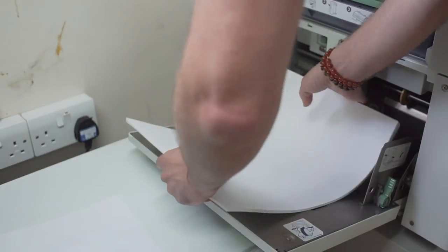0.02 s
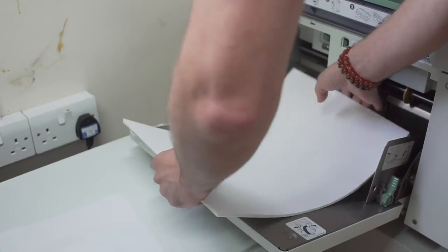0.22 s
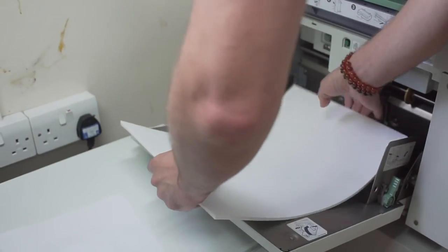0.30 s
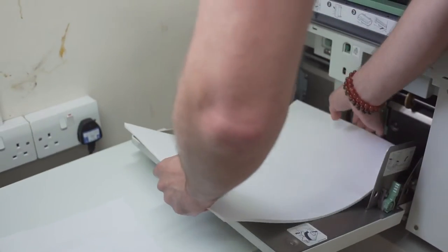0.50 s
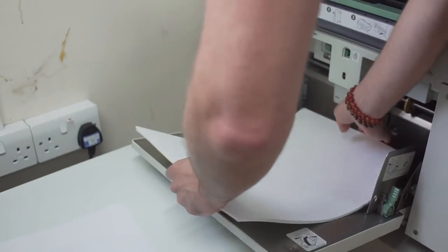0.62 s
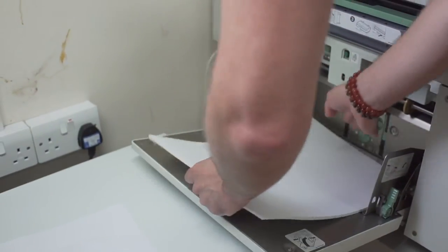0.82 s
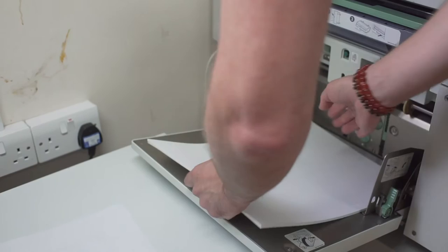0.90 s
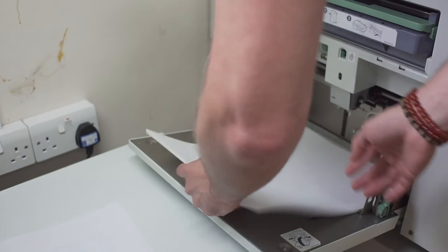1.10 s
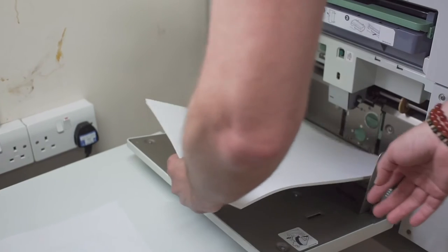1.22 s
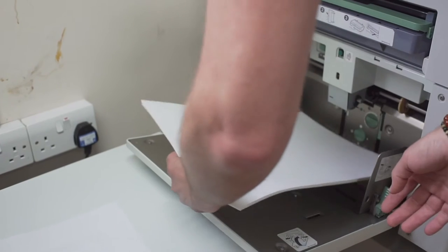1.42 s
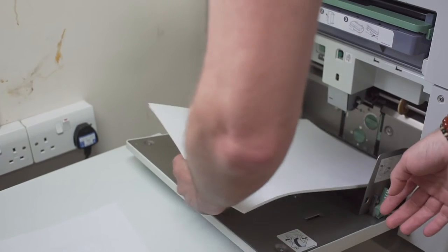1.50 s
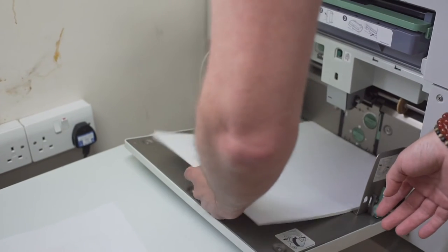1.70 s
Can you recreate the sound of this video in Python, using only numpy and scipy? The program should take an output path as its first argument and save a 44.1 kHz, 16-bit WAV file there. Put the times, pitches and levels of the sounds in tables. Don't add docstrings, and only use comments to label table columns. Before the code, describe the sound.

Close stereo pickup in a small print room: short paper drag, a loud slap and hollow metal bang with quick bounces, a light flick, a scraping slide, then dull knocks and small bumps over quiet fan hum.

```python
import sys
import numpy as np
from scipy import signal
from scipy.io import wavfile

SR = 44100
rng = np.random.default_rng(int(sys.argv[2]) if len(sys.argv) > 2 else 0)


def wav_record(signal):
    frames = np.transpose(np.atleast_2d(signal))
    bounded = np.clip(frames, -1, 1)
    quanta = np.round(bounded * 32767).astype(np.int16)
    wavfile.write(sys.argv[1], SR, quanta)


def volts_from_db(level):
    exponent = np.asarray(level, float) / 20
    return 10 ** exponent


N = 74970

# (frequency [Hz], level [dB per Hz])
ROOM_TONE = [(35, -34.5), (70, 1.5), (200, -2.5), (600, -5), (900, -10), (2500, -18.5), (6000, -30.5),
             (15500, -25.5)]
# (time [s], level [dB])
RUMBLE_LEVEL = [(0, -52), (.15, -59), (.2, -65), (.5, -61), (.6, -54.5), (.8, -63), (.95, -72.5),
                (1.1, -73), (1.28, -54), (1.45, -68), (1.7, -56)]
# (frequency [Hz], likeness [0 to 1])
LIKENESS = [(60, 0.93), (250, 0.87), (1000, 0.6), (2000, 0.46), (4000, 0.28), (12000, 0.24)]
# (time [s], level [dB])
AIR_LEVEL = [(.6, -92), (.645, -69), (.7, -64), (.75, -64), (.78, -85), (.97, -82), (1.01, -65),
             (1.08, -61), (1.2, -67), (1.3, -90)]

# (time [s], level [dB])
DRAG_IN = [
    (0.0, -68),
    (0.024, -55),
    (0.07, -49),
    (0.19, -93.5),
    (0.232, -60.5),
    (0.235, -54),
]
FLICK = [(.6, -94), (.63, -70.5), (.7, -69), (.712, -52.5), (.75, -48), (.762, -60.5), (.8, -60.5),
         (.812, -57.5), (.87, -78)]
LONG_SLIDE = [(.95, -87.5), (1.0, -71), (1.04, -60), (1.12, -54.5), (1.15, -50.5), (1.19, -52.5),
              (1.24, -55.5), (1.265, -52), (1.283, -51), (1.305, -60), (1.33, -58), (1.36, -55),
              (1.41, -60), (1.45, -72), (1.55, -72), (1.62, -86), (1.7, -92)]
# (time [s], level [dB])
RUB = [(1.3, -65), (1.35, -48), (1.4, -54.5), (1.47, -59), (1.55, -64), (1.6, -112), (1.7, -99)]
# (frequency [Hz], level [dB per Hz])
DRAG_TONE = [(880, -36.5), (1500, -23), (1900, -26), (2540, -26.5), (3800, -23), (5450, 7), (15500, 7)]
FLICK_TONE = [(2000, -18), (4000, -15.5), (5700, -44), (7000, -11), (10500, -7), (12500, -0.5), (15500, -7)]
SLIDE_TONE = [(400, -62), (900, -7.5), (2300, -13), (3300, -6), (4040, -6.5), (6500, -9.5), (12500, -6.5),
              (15500, -19)]
RUB_TONE = [(1500, -5.5), (2300, -16.5), (2700, -1.5), (3600, -9.5), (4200, -19.5), (7000, -18.5),
            (9000, -25), (10500, -29)]

# (frequency [Hz], width [Hz], level [dB])
EDGE_NOTES = [(3290, 120, -18), (3140, 124, -19.5), (3440, 190, -19.5), (1740, 170, -23.5),
              (2290, 770, -32), (4780, 470, -21.5)]
# (time [s], level [dB])
EDGE_EFFORT = [(.93, -4), (1.0, 5.5), (1.09, 10.5), (1.14, 1.5), (1.18, 5.5), (1.23, 1.5), (1.28, 4.5),
               (1.31, 4), (1.7, -15.5)]
# (time [s], level [dB])
SQUEAK_LEVEL = [(1.44, -82), (1.52, -76), (1.55, -74), (1.59, -84), (1.62, -99)]

# (time [s], level [dB],
# frequency [Hz], time to fall 60 dB [s])
BUMPS = [(0.00088, -36.5, 119, 0.29), (0.0039, -37.5, 430, 0.31), (0.016, -32, 368, 0.11),
         (0.0043, -34, 516, 0.12), (0.087, -39, 370, 0.11), (0.033, -45, 630, .15), (.09, -50, 600, 0.24),
         (0.24, -50.5, 440, .15), (0.25, -25.5, 1640, 0.057), (.257, -13, 540, 0.16),
         (0.2587, -14.5, 380, 0.16), (.262, -23, 805, .1), (.37, -28.5, 545, 0.098), (.4, -30.5, 272, .3),
         (0.521, -51, 205, 0.56), (1.355, -31.5, 814, 0.066), (1.355, -32.5, 455.3, .1),
         (1.3, -32.5, 210, 0.11), (1.6, -40, 310, .12), (1.27, -50.5, 560, 0.16), (1.56, -49, 440, 0.2),
         (1.604, -45.5, 870, 0.069), (1.58, -50, 184, 0.23), (1.67, -48.5, 170, 0.18),
         (1.572, -33, 61, 0.24), (1.609, -37.5, 426, 0.15), (1.615, -32, 68.5, 0.14),
         (1.637, -42.5, 450, 0.194), (1.666, -45, 440, 0.16)]
# (time [s], level [dB], time to fall 60 dB [s])
CRACKS = [
    (0.2404, -23, 0.06),
    (0.2444, -18, 0.043),
    (0.2646, -18.5, 0.067),
    (0.271, -25.5, 0.036),
    (1.149, -57, .06),
    (1.266, -52, 0.14),
    (1.279, -49.5, 0.12),
]
# (frequency [Hz], level [dB per Hz])
CRACK_TONE = [(300, -36), (900, -0.5), (1600, -7), (2600, -2), (4500, -9.5), (8000, -19.5), (13000, -21.5),
              (15500, -25.5)]
ECHO_TONE = [(300, -31), (900, -5.5), (1600, 5.5), (2600, -6), (4500, -7.5), (7000, -21), (11000, -14.5),
             (15500, -21.5)]

# (time [s], level [dB], contact cut-off [Hz])
KNOCKS = [
    (.231, -54, 1497),
    (1.349, -43.5, 2000),
    (1.358, -34.5, 1530),
    (1.376, -45.5, 1530),
    (1.396, -39.5, 403),
    (1.415, -42.5, 1210),
    (1.438, -44.5, 397),
    (1.462, -44.5, 497),
    (1.55, -52.5, 1500),
    (1.604, -56, 1460),
]
# (frequency [Hz], level [dB], time to fall 60 dB [s])
GUIDE_NOTES = [(189.5, -6.5, 0.094), (249.6, 0.5, 0.24), (447.6, 3, 0.11), (590, -12.5, 0.49),
               (676, -2.5, 0.081), (780, 4.5, 0.036), (870, 2.5, 0.045), (980, -8, 0.059),
               (1390, -13.5, 0.3)]
# (frequency [Hz], level [dB per Hz])
GUIDE_CLATTER = [(60, -35.5), (150, -11), (260, 1.5), (500, -1.5), (900, 0.5), (1600, -16), (3500, -16),
                 (15500, -68)]
# (time [s], level [dB], contact cut-off [Hz])
DROP = [(.2405, -15.5, 3000), (.2435, -17, 2557), (.2465, -10, 2596), (.2575, -11.5, 2446),
        (.2645, -14.5, 4500), (.2715, -15.5, 3560), (.284, -23, 1500), (.302, -18, 887),
        (.318, -31.5, 1200), (.335, -19.5, 696), (.368, -26.5, 801), (.428, -32.5, 402)]
# (frequency [Hz], level [dB], time to fall 60 dB [s])
TRAY_NOTES = [(137.5, -2.5, 0.11), (194.95, -14, 0.75), (236.4, 5.5, 0.2), (271.3, 2, 0.43),
              (300.6, 1, 0.14), (375.6, 7.5, 0.12), (446, -0.5, 0.27), (537, 2.5, 0.16), (698.7, -3, 0.2),
              (809, -7.5, 0.18), (1002, -9, 0.23), (1536, -8, .1), (1728, -13, 0.19), (2580, -6.5, 0.13)]
# (frequency [Hz], level [dB per Hz])
TRAY_CLATTER = [(40, -43.5), (90, -12.5), (170, -10), (330, -5), (800, -17), (2200, -21), (5000, -34.5),
                (15500, -34)]
# (frequency [Hz], time to fall 60 dB [s])
CLATTER_T60 = [(60, .4), (150, 0.32), (330, 0.32), (800, 0.28), (2500, 0.45), (5000, 0.44), (8000, 0.23),
               (14000, .27)]

NEARNESS = 0.5


def rms_one(x):
    return x / np.sqrt(np.mean(x ** 2) + 1e-20)


def in_time(rows):
    s, db = np.transpose(rows)
    after = db[-1] if s[-1] > 1.5 else -200
    return np.interp(np.arange(N) / SR, s, db, left=-200, right=after)


def at_hz(points, hz):
    table_hz, values = np.array(points)[:, 0], np.array(points)[:, 1]
    return np.interp(np.log(hz), np.log(table_hz), values)


def tilt(pan_db):
    return volts_from_db(np.array([[pan_db / 2], [-pan_db / 2]]))


def drift(rate_hz):
    r = np.exp(-80 * np.pi * rate_hz / SR)
    noise = rng.standard_normal(N // 40 + 2002)
    slow = rms_one(signal.lfilter([1], [1, -2 * r, r * r], noise)[2000:])
    return np.interp(np.arange(N) / 40, np.arange(len(slow)), slow)


def ring(x, hz, t60):
    r, w = volts_from_db(-60 / (t60 * SR)), 2 * np.pi * hz / SR
    return signal.lfilter([0, np.sin(w)], [1, -2 * r * np.cos(w), r * r], x + 1e-18)


def whistle(hz, width_hz):
    t60 = np.log(1000) / np.pi / width_hz
    once = ring(rng.standard_normal(N + 9000), hz, t60)
    return rms_one(ring(once, hz, t60)[9000:])


def bands(spectrum, patchy_db=0., t60=None, width=1):
    out, power, together = 0, 0, drift(9)
    t = np.arange(N) / SR
    edges = 25 * 2 ** np.arange(0, 9.7, .4)
    white = rng.standard_normal((2, 2, N + 4000))
    for k, (low, high) in enumerate(zip(edges, edges[1:])):
        band = signal.butter(2, [low, high], "band", fs=SR, output="sos")
        mid, side = signal.sosfilt(band, white[k % 2])[:, 4000:]
        hz = np.sqrt(low * high)
        alike = np.clip(at_hz(LIKENESS, hz), 0, 1) ** width
        gain = volts_from_db(at_hz(spectrum, hz))
        if t60 is None:
            shape = volts_from_db(patchy_db * (together + drift(25)))
        else:
            shape = volts_from_db(-60 * t / at_hz(t60, hz))
        power += gain ** 2 * (high - low) * 4 / SR
        stereo = np.sqrt(1 + alike) * mid + np.sqrt(1 - alike) * side * [[1], [-1]]
        out = out + gain * shape * stereo
    return out / np.sqrt(power)


def room():
    tone = volts_from_db(-63) * bands(ROOM_TONE)
    fan = volts_from_db(-66.5) * whistle(hz=567.4, width_hz=31.4)
    rumble = volts_from_db(in_time(RUMBLE_LEVEL)) * whistle(hz=57.2, width_hz=28)
    return tone + fan + rumble


def air():
    shared, left, right = [whistle(hz=13800, width_hz=3000) for _ in range(3)]
    return volts_from_db(in_time(AIR_LEVEL)) * (shared + np.array([left, right])) / np.sqrt(2)


def singing():
    notes = 0
    for hz, width_hz, db in EDGE_NOTES:
        wander_db = 3.5 * drift(25)
        notes = notes + volts_from_db(db + wander_db) * whistle(hz, width_hz)
    edge = volts_from_db(in_time(LONG_SLIDE) + in_time(EDGE_EFFORT)) * notes
    squeak = volts_from_db(in_time(SQUEAK_LEVEL)) * whistle(hz=8960, width_hz=310)
    return edge + squeak


def slide(stroke, tone, pan_db):
    return volts_from_db(in_time(stroke)) * bands(tone, patchy_db=0.7) * tilt(pan_db)


def bumps():
    out, t = np.zeros(N), np.arange(N) / SR
    rise_cycles = 2.5
    for s, db, hz, t60 in BUMPS:
        age = np.maximum(t - s, 0)
        rise = 1 - np.exp(-age * hz / rise_cycles)
        out += volts_from_db(db - 60 * age / t60) * rise * np.sin(2 * np.pi * hz * age)
    return out


def cracks():
    echo_db, echo_t60 = -18.5, 0.42
    puff, echo = 0, 0
    for s, db, t60 in CRACKS:
        age = np.arange(N) / SR - s
        puff = puff + (age >= 0) * volts_from_db(2 * db - 120 * np.abs(age) / t60)
        build_up = np.clip(age / .02, 0, 1)
        echo = echo + build_up * volts_from_db(2 * (db + echo_db) - 120 * np.abs(age) / echo_t60)
    near = np.sqrt(puff) * bands(CRACK_TONE, width=NEARNESS)
    return near + np.sqrt(echo) * bands(ECHO_TONE)


def contacts(rows, spread_s, notes_hz):
    count = len(notes_hz) + 1
    out, t = np.zeros((count, N + 2000)), np.arange(2000) / SR
    swell = np.exp(-t / spread_s) * (1 - np.exp(-4 * t / spread_s))
    waves = np.exp(2j * np.pi * np.outer(notes_hz, t))
    for s, db, cut_hz in rows:
        touches = rng.standard_normal((count, 2000)) * swell
        strength = np.abs(np.sum(touches[:-1] * waves, axis=1, keepdims=True))
        touches[:-1] /= strength + 1.5
        touches[-1] /= np.sqrt(np.sum(touches[-1] ** 2))
        r = np.exp(-2 * np.pi * cut_hz / SR)
        start = int(s * SR)
        out[:, start:start + 2000] += volts_from_db(db) * signal.lfilter([1 - r], [1, -r], touches)
    return out[:, :N]


def blows(rows, spread_s, notes, notes_db, clatter_db, clatter):
    trains = contacts(rows, spread_s, [hz for hz, db, t60 in notes])
    rung = sum(volts_from_db(db) * ring(train, hz, t60) for train, (hz, db, t60) in zip(trains, notes))
    rattle = signal.fftconvolve(trains[-1:], clatter)[:, :N]
    both = volts_from_db(notes_db) * rung + volts_from_db(clatter_db) * rattle
    return signal.sosfilt(signal.butter(2, 85, "high", fs=SR, output="sos"), both)


def guide_knocks():
    clatter = bands(GUIDE_CLATTER, t60=CLATTER_T60, width=NEARNESS)
    return blows(KNOCKS, 0.0044, GUIDE_NOTES, notes_db=-2.5, clatter_db=-3.5, clatter=clatter)


def stack_drop(clatter):
    bang = blows(DROP, 0.00081, TRAY_NOTES, notes_db=-7.5, clatter_db=-9.5, clatter=clatter)
    return bang * tilt(-1.0)


def scene():
    clatter = bands(TRAY_CLATTER, t60=CLATTER_T60, width=NEARNESS)
    earlier_blow = volts_from_db(-39.5) * clatter[::-1]
    hits = stack_drop(clatter) + cracks() + guide_knocks()
    paper = slide(DRAG_IN, DRAG_TONE, pan_db=-0.5) + slide(FLICK, FLICK_TONE, pan_db=-0.3)
    paper += slide(LONG_SLIDE, SLIDE_TONE, pan_db=-1) + slide(RUB, RUB_TONE, pan_db=-1)
    return hits + earlier_blow + bumps() + paper + singing() + room() + air()


def roll_off(x):
    return signal.sosfilt(signal.butter(12, 16230, fs=SR, output="sos"), x)


def record(dry):
    treble = signal.sosfiltfilt(signal.butter(1, 9940, "high", fs=SR, output="sos"), dry)
    uneven = dry + 0.3 * treble * [[1], [-1]]
    heard = 1.535 * np.tanh(1.348 * uneven / 1.478)
    top_cut = signal.ellip(12, .5, 60, 15800, fs=SR, output="sos")
    mix = signal.sosfilt(top_cut, heard)
    return roll_off(mix)


dry = scene()
out = record(dry)
wav_record(out)
```